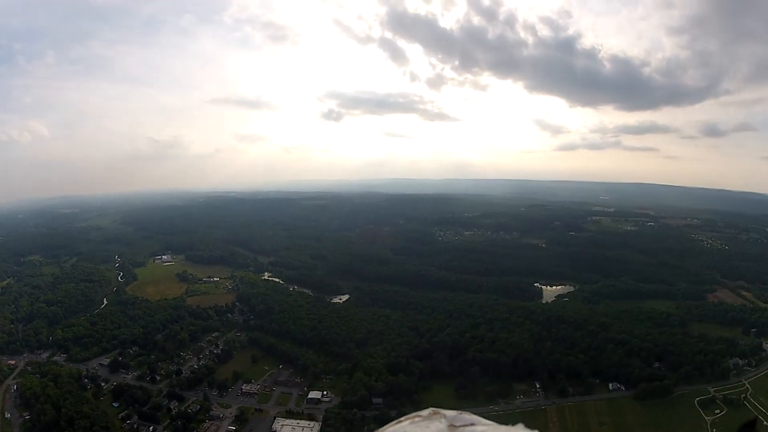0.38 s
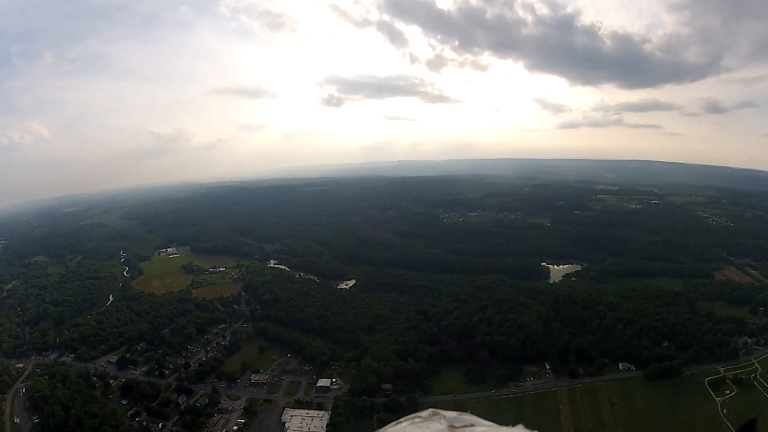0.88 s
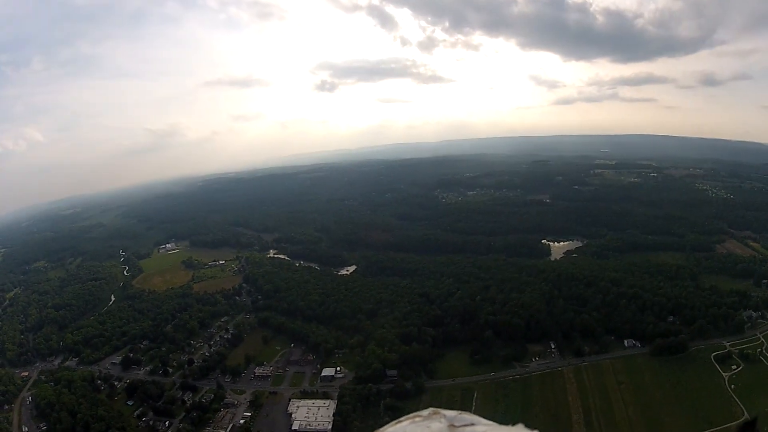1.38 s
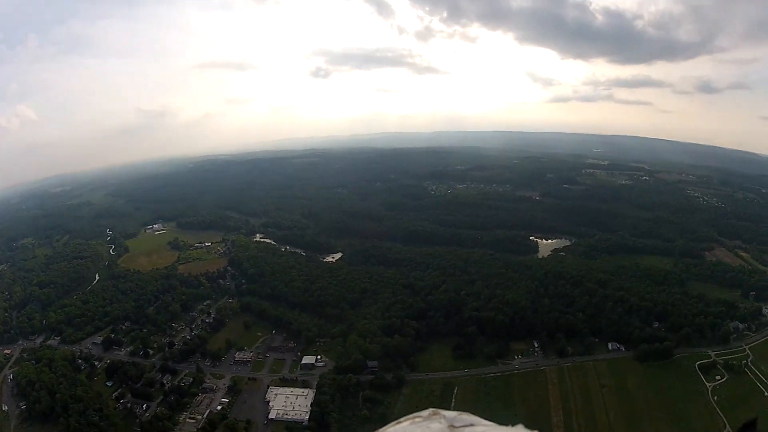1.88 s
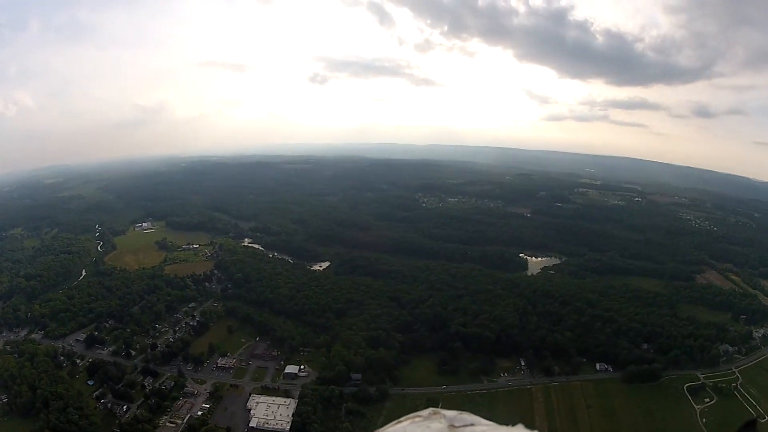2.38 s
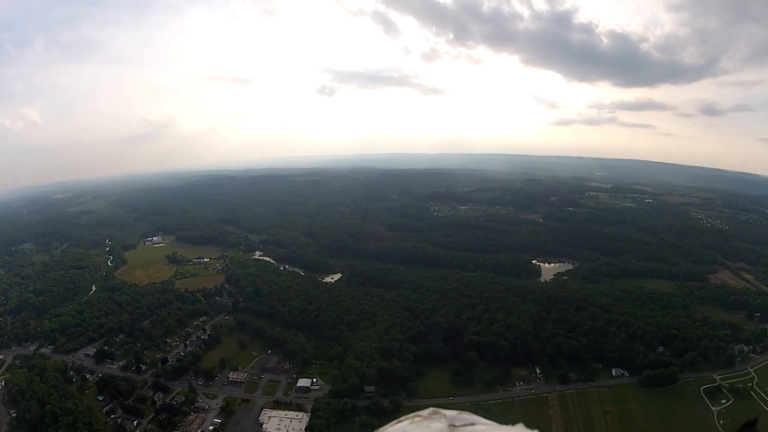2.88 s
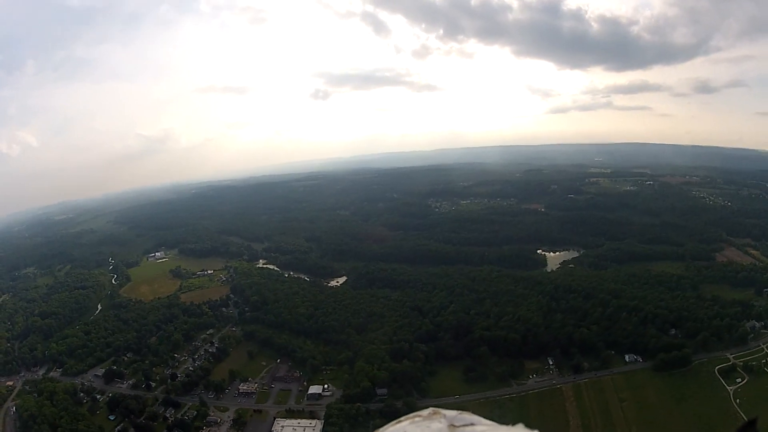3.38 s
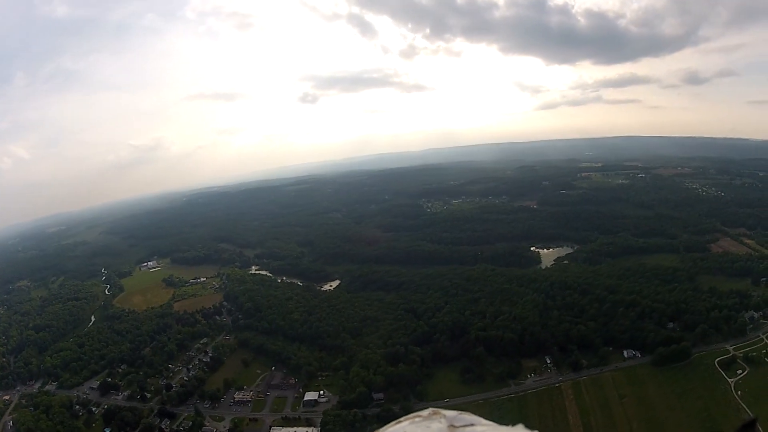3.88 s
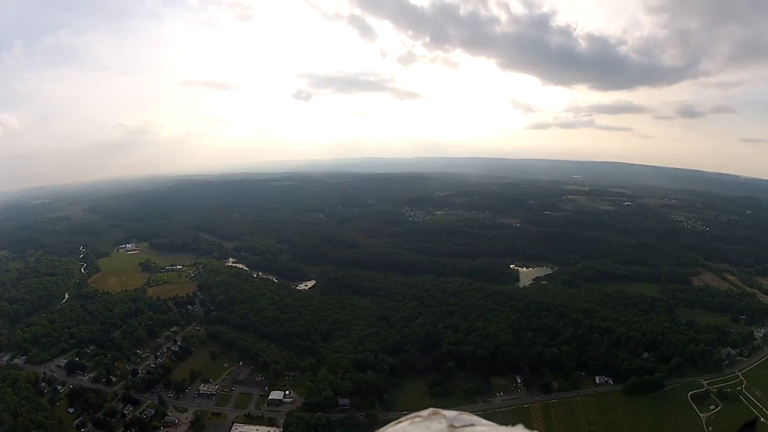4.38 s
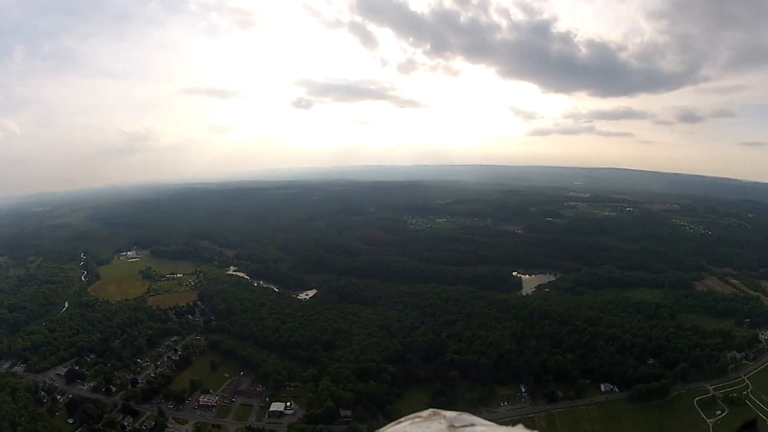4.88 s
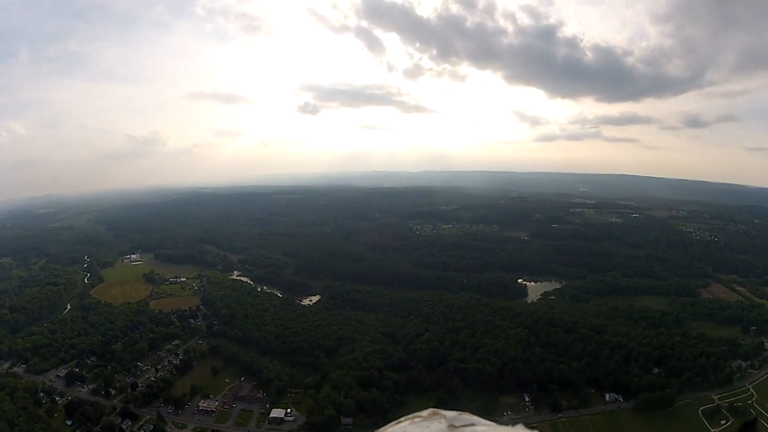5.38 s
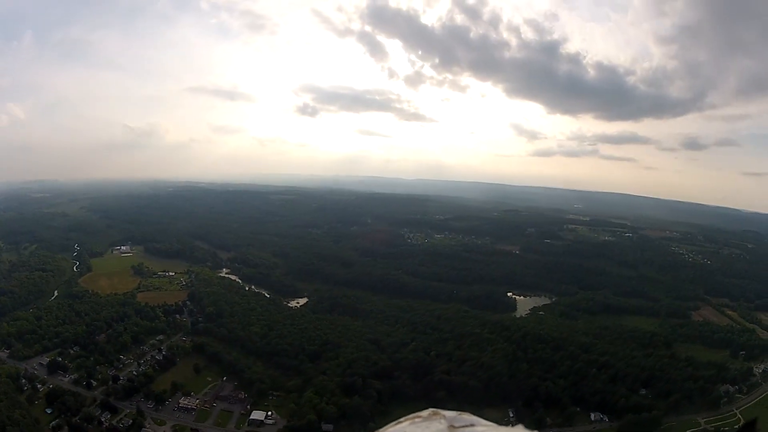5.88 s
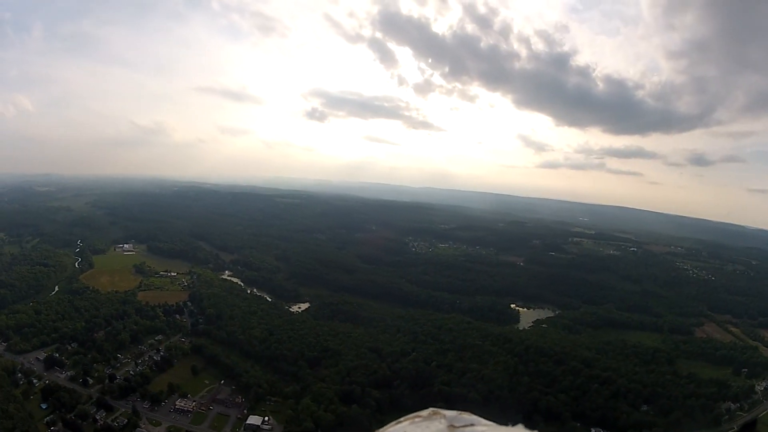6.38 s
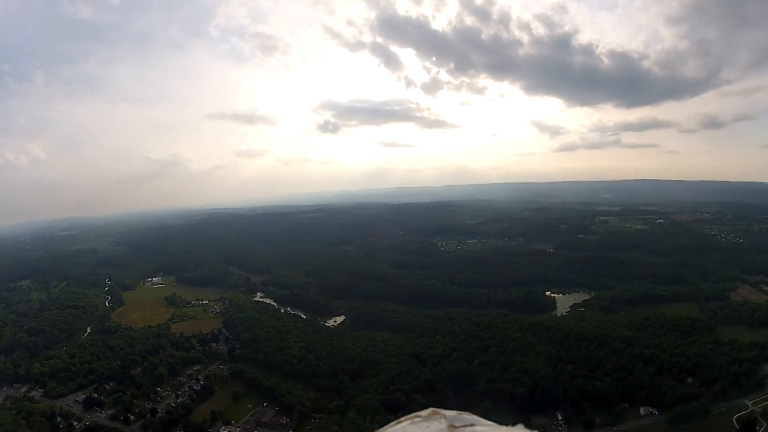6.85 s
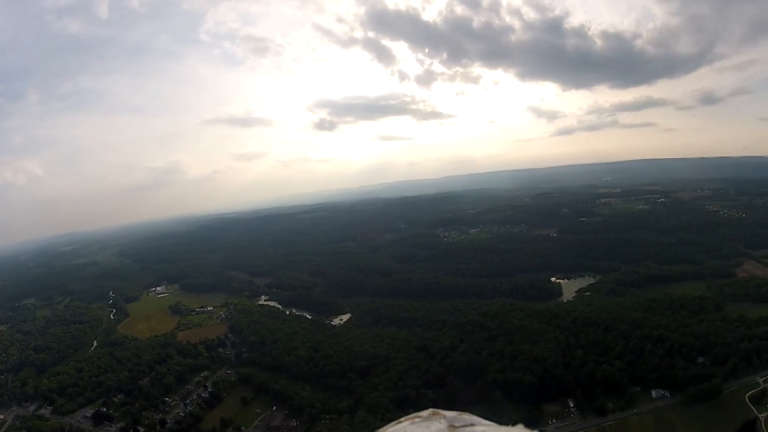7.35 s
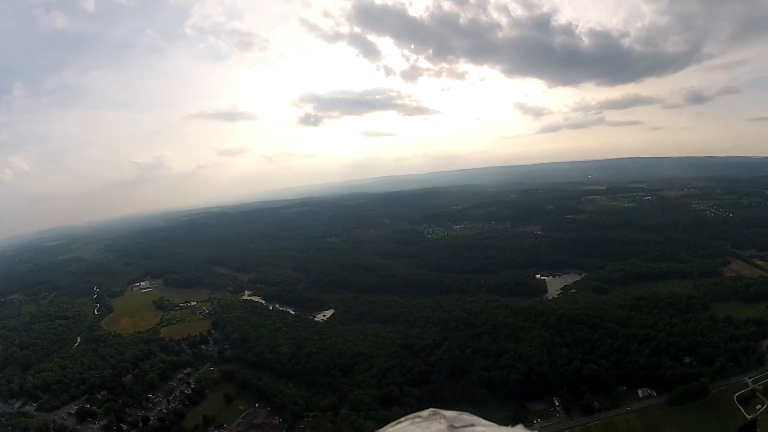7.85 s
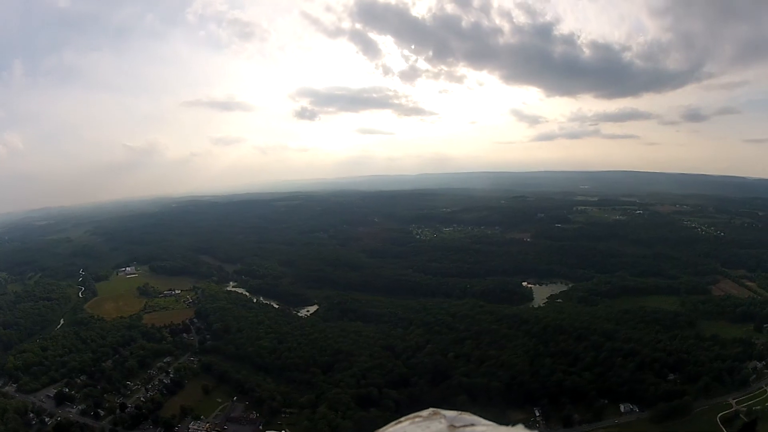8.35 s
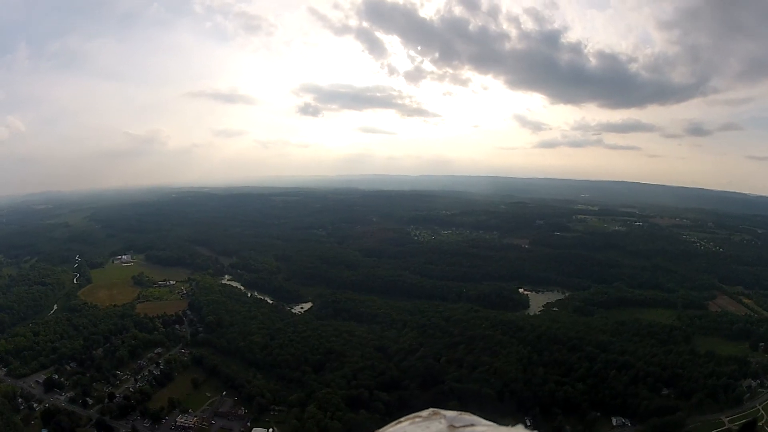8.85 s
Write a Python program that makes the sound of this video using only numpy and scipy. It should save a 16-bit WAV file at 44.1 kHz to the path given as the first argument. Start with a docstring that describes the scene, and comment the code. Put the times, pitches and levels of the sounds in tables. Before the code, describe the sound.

Throughout nine seconds, wind batters a microphone fixed to a small electric model plane: a dense low roar, mostly around 100 to 300 Hz, with irregular blunt thumps several times a second that briefly squash everything else. Under it runs a nasal motor hum and a loose part knocking once per shaft turn, so fast it becomes a dry, raspy buzz. The motor starts near 160 turns a second, sinks to about 135 by 0.8 s, and rises slightly near 3.4 s. The rattle is strong from 0.5 to 2 s, weak near 2.5, clear again around 3.3, then patchy. It swells towards 7.1 s; at 7.3 the motor steps up to almost 150, with a burst of hiss and brighter wind. Afterwards the rattle drops to short flares near 8 and 8.5 s. Wind gaps are tiny, as at 4.97 s. Close, dry, gritty, with no fade.

```python
"""Wind buffets the microphone of a camera riding on a small electric model plane: coloured noise,
one-sided pushes and low pressure thumps. A loose part knocks and rings once every turn of the shaft.
The motor hums through the foam airframe as multiples of the shaft speed, and air hisses as noise.
Loud peaks pull the gain down, and holding the sound in coarse steps mirrors it around the step rate."""
import sys
import numpy as np
from scipy import signal
from scipy.fft import rfft, irfft, next_fast_len
from scipy.io import wavfile
from scipy.ndimage import uniform_filter1d

SR = 44100
rng = np.random.default_rng(int(sys.argv[2]) if len(sys.argv) > 2 else 0)


def volts_from_decibels(level):
    """Turn decibel levels (scalar or array-like) into linear amplitude factors."""
    exponent = np.asarray(level, float) / 20
    return 10 ** exponent


def transcribe(signal):
    """Save signal, clipped to [-1, 1], as a 16-bit WAV file at the path in sys.argv[1]."""
    frames = np.atleast_2d(signal).T
    limited = np.clip(frames, -1, 1)
    pcm = np.round(limited * 32767).astype(np.int16)
    wavfile.write(sys.argv[1], SR, pcm)


N = 396445  # length in samples


def evened(x):
    """Scales to rms 1."""
    return x / np.sqrt(np.mean(x ** 2) + 1e-20)


def curves(rows):
    """Draws straight lines between table rows: one value per sample for each column after the time."""
    times, *columns = np.transpose(rows)
    return [np.interp(np.arange(N) / SR, times, column) for column in columns]


def bumps(rows):
    """Adds up smooth humps in dB from rows of (t/s, half length/s, level/dB)."""
    t = np.arange(N) / SR
    return sum(db * np.exp(-((t - middle) / half) ** 2) for middle, half, db in rows)


def shaped(x, gain):
    """Filters x: multiplies its spectrum by gain(Hz)."""
    size = next_fast_len(N)
    hz = np.arange(size // 2 + 1) * SR / size
    return irfft(rfft(x, size) * gain(hz), size)[:N]


def coloured(x, points):
    """Colours x by a table of (f/Hz, level/dB)."""
    f, db = np.transpose(points)
    return shaped(x, lambda hz: volts_from_decibels(np.interp(np.log(hz + 1), np.log(f + 1), db)))


def wander(seconds):
    """Random drift of rms 1: noise averaged twice over the given time."""
    width = max(round(seconds * SR), 2)
    once = uniform_filter1d(rng.standard_normal(N), width)
    return evened(uniform_filter1d(once, width))


# colour of the wind buffeting: (f/Hz, relative level/dB)
BUFFET_COLOUR = [(12, -59.5), (20, -33), (91, -3.5), (178, 0), (268, -2), (326, -8.5), (376, -13),
                 (418, -14), (712, -31), (779, -37), (851, -36), (1030, -52), (1400, -53), (1820, -67.5),
                 (3080, -120)]
# changes in the upper edge and deepest rumble of the wind: (t/s, edge level added/dB, rumble level added/dB)
WIND_BANDS = [(0, -2, 3.5), (.8, -1, -4.5), (1.5, 2, -4), (2.0, -0.5, -2), (2.35, -2.5, -2.5), (2.8, 0, 2),
              (3.4, 3, -4), (3.8, 1.5, -2), (4.3, 0.5, 2), (4.75, -3.5, -4), (5.2, -1.5, 1.5),
              (6.1, -1.5, 1), (6.7, -3, 0), (7.05, 0.5, 3), (7.25, 7, -21), (7.55, -0.5, -3), (8.2, 1, 0),
              (8.99, -2.5, -1.5)]
# the body of the wind drops for a moment: (t/s, half length/s, level/dB)
WIND_LULLS = [(1.8, 0.024, -4), (2.0, 0.03, -5), (2.92, 0.03, -4), (3.47, 0.026, -3.5), (4.965, 0.013, -15),
              (7.08, .05, -1.5), (8.39, 0.033, -2.5)]
# level of the body in dB, then edge and rumble relative to it
BUFFET_DB, EDGE_DB, RUMBLE_DB = -18, -14.5, -11.5
# how far each drifts (rms), and the time over which gusts change
BUFFET_DRIFT_DB, EDGE_DRIFT_DB, RUMBLE_DRIFT_DB, GUST_S = 0.76, 1, 2, 0.051


def buffeting():
    """Eddies roll over the port: noise and many one-sided pushes, brighter or deeper as gusts change."""
    edge_add_db, rumble_add_db = curves(WIND_BANDS)
    body_db = BUFFET_DB + BUFFET_DRIFT_DB * wander(GUST_S) + bumps(WIND_LULLS)
    edge_db = BUFFET_DB + EDGE_DB + edge_add_db + EDGE_DRIFT_DB * wander(GUST_S)
    rumble_db = BUFFET_DB + RUMBLE_DB + rumble_add_db + RUMBLE_DRIFT_DB * wander(3 * GUST_S)
    # about 220 pushes a second, of random strength
    push_db = 2.27 * np.minimum(rng.exponential(1, N), 2.5)
    pushes = (rng.random(N) < 220 / SR) * volts_from_decibels(push_db)
    drive = 0.63 * rng.standard_normal(N) + 0.74 * evened(pushes - pushes.mean())
    eddies = coloured(drive, BUFFET_COLOUR)
    # rumble lies below about 90 Hz, edge above about 400 Hz, body between them
    rumble = shaped(eddies, lambda hz: 1 / (1 + (hz / 90) ** 6))
    edge = shaped(eddies, lambda hz: 1 - 1 / (1 + (hz / 400) ** 6))
    body = evened(eddies - rumble - edge)
    return volts_from_decibels(body_db) * body + volts_from_decibels(edge_db) * evened(edge) + volts_from_decibels(rumble_db) * evened(rumble)


# strongest pressure thumps: (t/s of the peak, peak level/dB before the gain control, f/Hz of the swing)
STRONG_THUMPS = [(0.0571, -1.5, 201), (0.1677, -3, 221), (0.2584, -3, 188), (0.3742, -4.5, 167),
                 (0.5727, -4, 103), (0.7194, -1, 176), (0.796, -1.5, 150), (0.8647, -2.5, 182),
                 (1.143, 0, 226), (1.202, -0.5, 192), (1.4611, -5, 191), (1.739, -5, 125),
                 (1.86, -2.5, 240), (1.9048, -4, 184), (1.944, -7.5, 180), (2.0274, -7, 218),
                 (2.0593, -4.5, 161), (2.1362, -7, 164), (2.2255, -2, 172), (2.3032, -7, 199),
                 (2.385, -0.5, 198), (2.6427, -2.5, 190), (2.6859, -2, 193), (2.7905, -5, 195),
                 (2.8151, -6, 180), (3.003, 0, 204), (3.0989, -1, 206), (3.335, -5.5, 223),
                 (3.3738, -1.5, 197), (3.6102, -1, 179), (3.7162, -3.5, 165), (4.009, -2.5, 99),
                 (4.206, -4.5, 260), (4.3171, -5.5, 181), (4.3767, -6, 195), (4.485, -2, 185),
                 (4.6071, -1, 196), (4.7985, -5, 202), (4.933, -3.5, 204), (5.005, -8, 159),
                 (5.149, -5.5, 156), (5.217, -7.5, 167), (5.308, -3, 225), (5.4756, -4.5, 146),
                 (5.616, -3.5, 156), (6.072, -2.5, 191), (6.2033, 0, 195), (6.3959, -3.5, 159),
                 (6.5675, -2, 172), (6.735, -3, 205), (6.8833, -2, 175), (7.1226, -5, 197),
                 (7.2901, -3.5, 222), (7.3375, -5, 187), (7.378, -3, 212), (7.4397, -3.5, 240),
                 (7.451, -1.5, 216), (7.4931, -2.5, 196), (7.563, -3, 246), (7.6468, -2, 181),
                 (7.735, 0.5, 174), (7.8106, -1, 190), (7.843, -4, 206), (8.3556, -1.2, 176),
                 (7.9415, -4, 176), (8.4935, -5, 202), (8.5755, -4, 178), (8.6603, -4, 154),
                 (8.9674, -4, 213)]
DIP, DIP_SPREAD = 0.72, .2  # how far the dip before a peak reaches back: average share and its spread
# weaker thumps come by chance, one in each slot
SLOT_S, WEAK_DB, WEAK_SPREAD_DB, WEAK_HZ, WEAK_SPREAD_HZ = .19, -6.5, 2, 188, 27.5


def thumps():
    """A thump is a suction dip, then a pressure peak, then a small rebound."""
    out = np.zeros(N + 2000)
    t = np.arange(-1000, 1000) / SR
    chance = rng.standard_normal((200, 3))
    slots = np.arange(0, N / SR - SLOT_S, SLOT_S)[:len(chance)]
    place = rng.random(len(chance))
    weak = [(slot + SLOT_S * p, WEAK_DB + WEAK_SPREAD_DB * a, WEAK_HZ + WEAK_SPREAD_HZ * b)
            for slot, p, (a, b, _) in zip(slots, place, chance)]
    for (peak_s, db, hz), deep in zip(STRONG_THUMPS + weak, chance[:, 2]):
        cycles = t * hz
        # deeper dips reach further back
        reach = 0.39 + 0.17 * (DIP + DIP_SPREAD * deep)
        spread = np.where(cycles < 0, reach, .42)
        thump = np.cos(2 * np.pi * cycles) * np.exp(-(cycles / spread) ** 2)
        out[round(peak_s * SR):][:2000] += volts_from_decibels(db) * thump
    return out[1000:N + 1000]


# what the knocked part rings with: (f/Hz, signed relative strength, decay time constant/ms)
KNOCK_RING = [(1890, .05, 3.0), (2390, -1.0, .54), (2840, 1.0, .64), (3410, -.29, .21), (3810, .08, 2.69),
              (4270, .17, 1.18), (5030, -.19, 1.2), (5500, -.045, .9), (5880, .02, .83)]
KNOCK_TOP_HZ, KNOCK_TOP_DB = 5400, -6  # the ring is dull above this


def knocks(turns, knock_db):
    """One blow a turn, uneven in strength and time; every second blow tends to land early."""
    at = np.flatnonzero(np.diff(np.floor(turns)))
    chance = rng.standard_normal((len(at), 2))
    # timing errors in samples: a to-and-fro limp and a random scatter
    limp = (-1) ** np.arange(len(at)) * 2.5 * (1 + .7 * wander(.1)[at])
    scatter = 2.0 * chance[:, 0]
    at = np.clip(at + np.round(limp + scatter).astype(int), 0, N - 1)
    blows = np.zeros(N)
    blows[at] = volts_from_decibels(knock_db[at] + 2.0 * chance[:, 1])
    ms = np.arange(600) / SR * 1000
    ring = sum(push * np.exp(-ms / decay_ms) * np.sin(2 * np.pi * hz * ms / 1000)
               for hz, push, decay_ms in KNOCK_RING)
    rung = signal.oaconvolve(blows, ring / np.linalg.norm(ring))[:N]

    def tone(hz):
        """Thins the sound below 1000 Hz and dulls the top."""
        low_cut = 1 - 1 / (1 + (hz / 1000) ** 4)
        return low_cut * volts_from_decibels(KNOCK_TOP_DB / (1 + (KNOCK_TOP_HZ / (hz + 1)) ** 40))

    return shaped(rung, tone)


# airframe resonances that pick out multiples of the shaft speed: (f/Hz, width/Hz, relative level/dB)
AIRFRAME_RESONANCES = [(708, 64, -47), (754, 45, -44.5), (825, 72, -49), (910, 56, -49), (953, 65, -53.5),
                       (1060, 130, -57), (1160, 50, -51.5), (1205, 100, -52.5), (1650, 140, -53),
                       (1902, 160, -50), (2090, 160, -66), (3164, 93, -50.5)]
# multiples of the shaft speed that the motor shakes out: (multiple)
HUM_MULTIPLES = [4, 5, 6, 7, 8, 9, 10, 11, 12, 13, 14, 21]
# strength of each of those multiples, in the same order: (relative level/dB)
HUM_MULTIPLE_LEVELS = [-14, -1.7, -2.7, 2, -6, -2, 4, -5.5, 0.5, -1.5, -2, -0.2]


def hum(speed, turns, hum_db):
    """Multiples of the shaft speed, loud where they meet an airframe resonance, each wavering."""
    out = np.zeros(N)
    for k, own_db in zip(HUM_MULTIPLES, HUM_MULTIPLE_LEVELS):
        power = sum(volts_from_decibels(2 * db) / (1 + (2 * (k * speed - hz) / width) ** 2) ** 2
                    for hz, width, db in AIRFRAME_RESONANCES)
        strength = np.sqrt(2 * power) * volts_from_decibels(own_db + 0.64 * wander(0.24))
        out += strength * np.cos(2 * np.pi * (k * turns + rng.random()))
    return out * volts_from_decibels(hum_db)


# colour of the airflow hiss: (f/Hz, relative level/dB)
HISS_COLOUR = [(600, 0.5), (1000, -8.5), (1250, -11.5), (1550, -3), (1950, 0), (2400, -3), (2950, -6),
               (3300, -8.5), (3750, -6), (4300, -12.5), (5000, -16.5), (5500, -25), (5950, -31)]


def hiss(turns, hiss_db):
    """Air past the housing: coloured noise, fluttering and a little chopped by the blades."""
    chop = 1 + 0.2 * np.cos(2 * np.pi * turns)
    air = evened(coloured(rng.standard_normal(N), HISS_COLOUR))
    return volts_from_decibels(hiss_db + 2.52 * wander(0.003)) * chop * air


# motor speed through the throttle changes, before a small wavering: (t/s, f/Hz in turns per second)
SHAFT_SPEED = [(0.0, 159.3), (0.11, 159.8), (0.4, 143.7), (0.58, 137.8), (0.8, 135.5), (1.4, 134.6),
               (2.0, 134.9), (2.35, 135.6), (3.24, 134.8), (3.38, 138.7), (3.52, 140.3), (4.2, 140.0),
               (4.65, 140.7), (5.4, 139.6), (6.4, 139.3), (7.05, 138.4), (7.31, 148.0), (7.4, 148.9),
               (8.0, 149.1), (8.35, 149.8), (8.5, 152.0), (8.99, 152.1)]
# basic levels through the flight: (t/s, knock level/dB, airflow hiss level/dB, motor hum gain/dB)
FLIGHT_LEVELS = [(0.0, -18, -36.5, 1), (0.32, -24.5, -39.5, 1), (0.47, -12, -38.5, -1.5),
                 (0.9, -11, -39, -3.5), (1.2, -8.5, -36.5, 3), (1.6, -11.5, -38, -1), (1.85, -9, -35.5, 3),
                 (2.0, -13.5, -39, -1.5), (2.2, -14.5, -39, -5), (2.45, -24, -39, -2), (2.85, -18, -38, 1),
                 (3.1, -16.5, -37, 3), (3.3, -10, -36, 2), (3.6, -13.5, -36.5, 3.5), (4.0, -14.5, -38, 1),
                 (4.3, -28, -36.5, 1), (4.7, -17, -40.5, -3.5), (5.3, -21, -38.5, -0.5),
                 (6.2, -17, -38.5, -2.5), (6.38, -14, -39, -3), (6.9, -10.5, -38, 0.5),
                 (7.13, -5.5, -37.5, 3.5), (7.28, -7.5, -31.5, 5), (7.32, -26, -36.5, 10),
                 (7.6, -23.5, -38.5, 3), (8.3, -30, -39.5, 1.5), (8.99, -24.5, -40, -2)]
# knock and hiss flare up briefly: (t/s, half length/s, knock level added/dB, hiss level added/dB)
BRIEF_FLARES = [(.25, 0.017, 4, 0.5), (1.13, .03, 2, 2.5), (2.75, 0.017, 4, 1), (2.95, 0.12, 4, 2),
                (3.58, 0.017, 1.5, 0.5), (4.058, 0.018, 4, 0), (4.178, .03, 6, 1), (4.53, .02, 4.5, 0.5),
                (5.31, 0.034, 6, 3), (5.583, 0.048, 2.5, 7), (6.734, .025, 5.5, 3), (7.331, 0.013, 17, 3),
                (7.423, 0.031, 13.5, 2.5), (7.54, 0.017, 2, 1), (7.997, 0.033, 11, 1), (8.112, 0.017, 7, 2),
                (8.46, 0.07, 13.5, 1)]
FIRM_DB, CHATTER = -14, 0.2  # below this strength the knock comes and goes, in dB per dB


def scene():
    """Wind, motor and rattle add up at one microphone; knock, hum and hiss share the turning shaft."""
    speed, = curves(SHAFT_SPEED)
    turns = np.cumsum(speed + .2 * wander(0.091)) / SR
    knock_db, hiss_db, hum_db = curves(FLIGHT_LEVELS)
    flares = np.array(BRIEF_FLARES)
    flare_knock_db = bumps(flares[:, [0, 1, 2]])
    flare_hiss_db = bumps(flares[:, [0, 1, 3]])
    chatter_db = CHATTER * np.maximum(FIRM_DB - knock_db - flare_knock_db, 0) * wander(0.011)
    knock_db = knock_db + flare_knock_db + chatter_db
    hiss_db = hiss_db + flare_hiss_db
    wind = buffeting() + thumps()
    plane = knocks(turns, knock_db) + hum(speed, turns, hum_db) + hiss(turns, hiss_db)
    return (wind + plane)[None]


def gain_control(x):
    """Each strong pressure peak pulls the gain down a few milliseconds later; it creeps back steadily."""
    peak_db = 20 * np.log10(abs(x) + 1e-6)
    fall = np.arange(N) * 60. / SR  # recovery: the held peak falls 60 dB a second
    held_peak_db = np.maximum.accumulate(peak_db + fall) - fall
    over_db = np.maximum(held_peak_db + 9.5, 0)  # amount above -9.5 dB
    late_db = signal.lfilter([1 / 90], [1, 1 / 90 - 1], over_db)  # lags by about 90 samples
    return x * volts_from_decibels(2.0 - 0.63 * late_db)


def overload(x):
    """Rounds off peaks softly as they near full scale."""
    return x / (1 + abs(x) ** 6) ** (1 / 6)


STEP_HZ = 12000  # rate of the coarse steps


def held_in_steps(x):
    """Values held between steps: the sound is mirrored around the step rate, under a sinc droop."""
    narrow = shaped(x, lambda hz: (hz < STEP_HZ / 2) * (1 - 1 / (1 + (hz / 30) ** 4)))
    mirrored = narrow * (1 + 2 * np.cos(2 * np.pi * STEP_HZ * np.arange(N) / SR))
    # the droop of held values, and a steep top limit near 15.4 kHz
    return shaped(mirrored, lambda hz: np.sinc(hz / STEP_HZ) / (1 + (hz / 15380) ** 90))


def top_cut(x):
    """Nothing passes above the cut-off."""
    return signal.sosfilt(signal.butter(12, 16420, fs=SR, output="sos"), x)


def record(dry):
    """Gain control, soft overload, then values held in coarse steps."""
    ruled = gain_control(dry[0])
    soft = overload(ruled)
    held = held_in_steps(soft)
    return top_cut(held[None])


dry = scene()
out = record(dry)
transcribe(out)
```